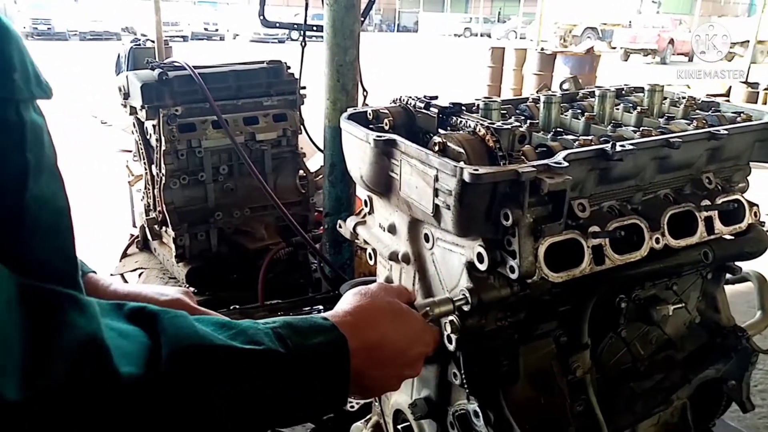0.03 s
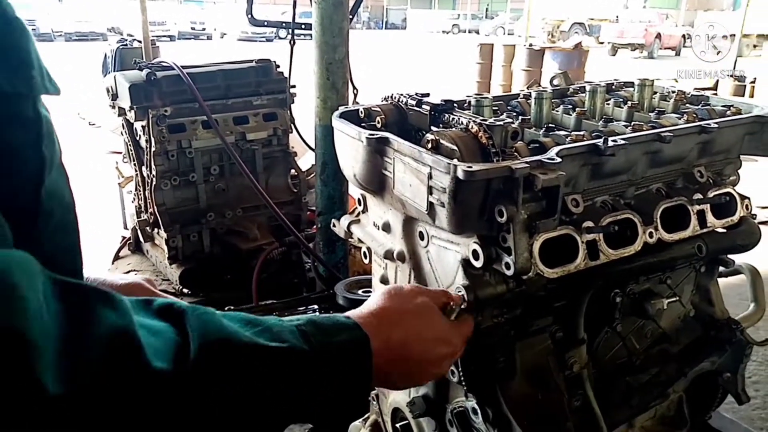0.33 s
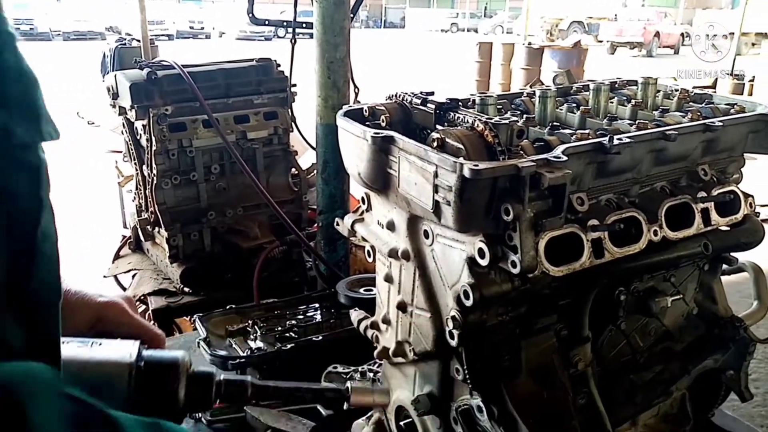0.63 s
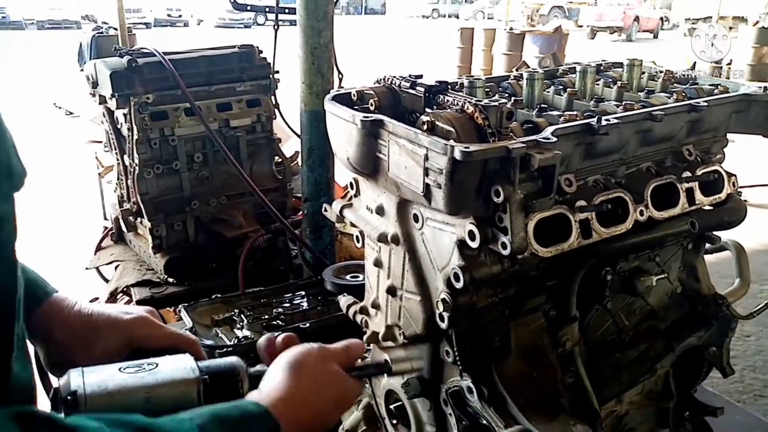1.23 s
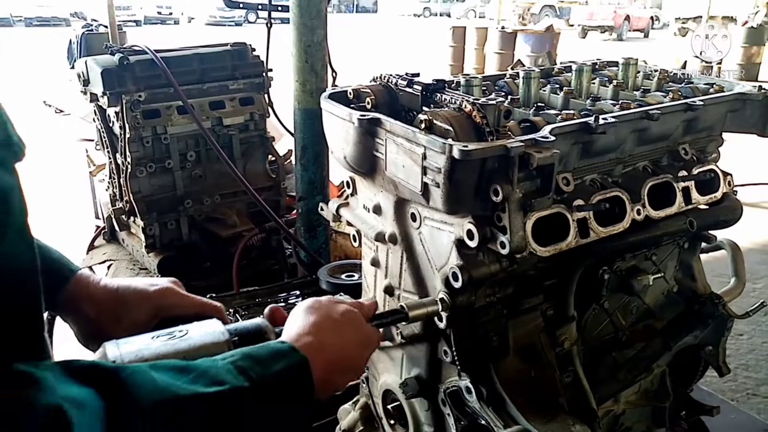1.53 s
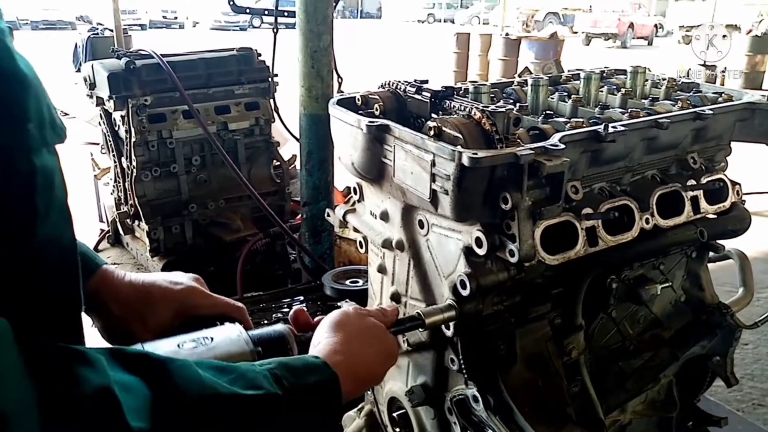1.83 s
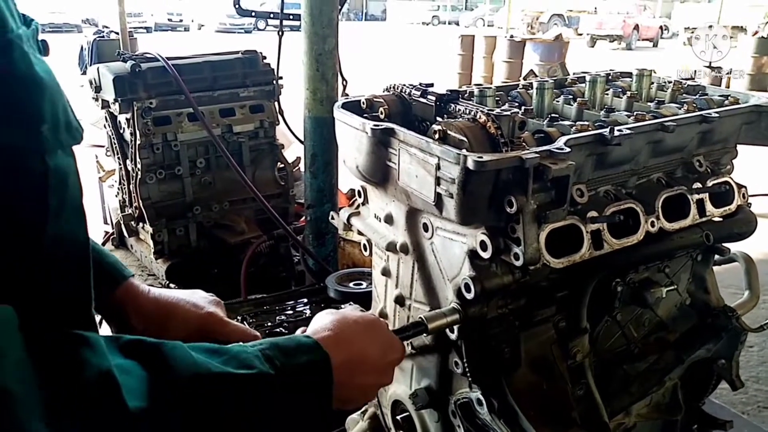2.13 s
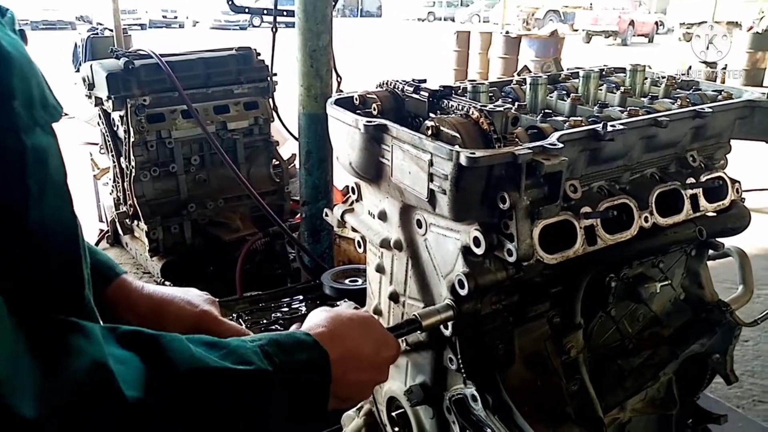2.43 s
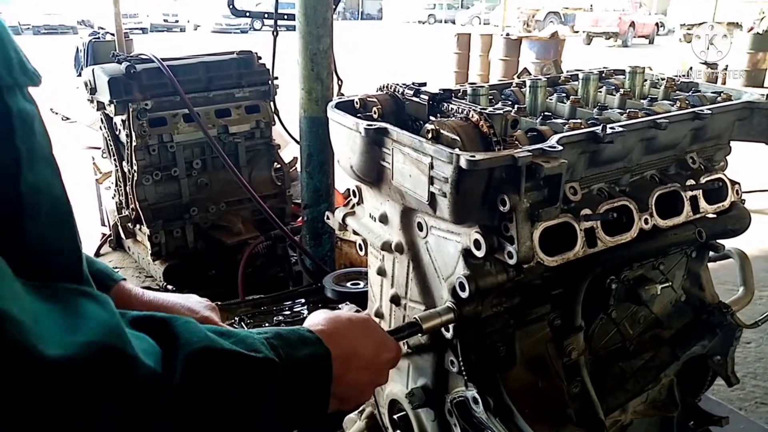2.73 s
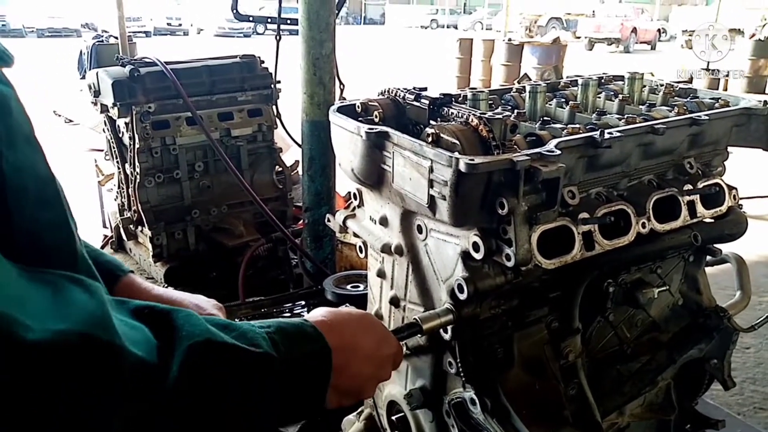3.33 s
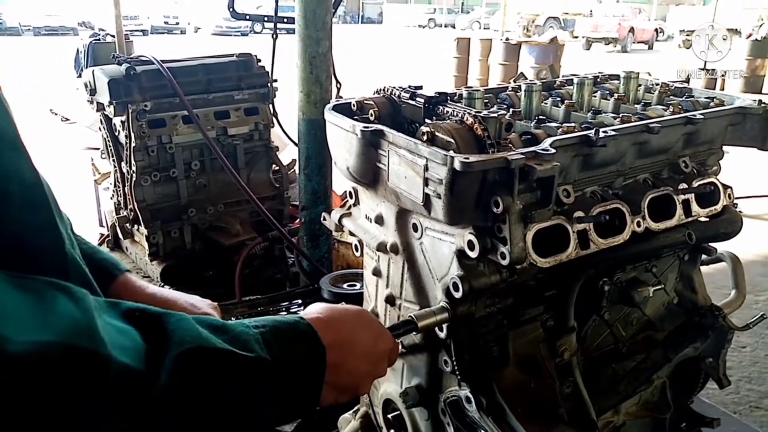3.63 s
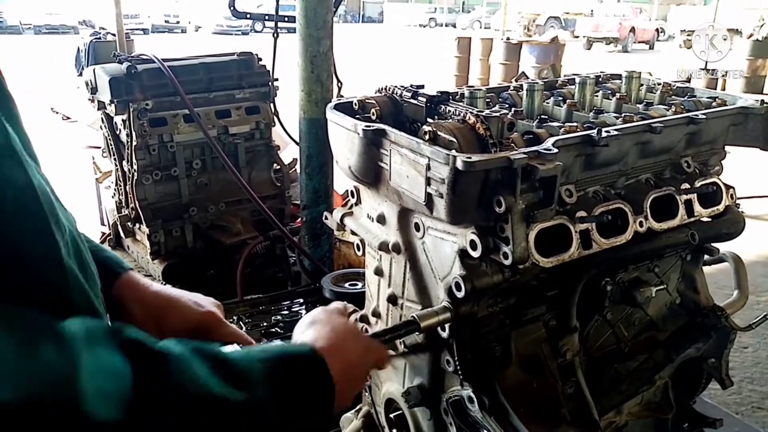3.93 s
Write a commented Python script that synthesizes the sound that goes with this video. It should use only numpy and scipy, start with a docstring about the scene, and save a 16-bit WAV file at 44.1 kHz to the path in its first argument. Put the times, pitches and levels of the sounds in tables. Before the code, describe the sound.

Close up in a workshop, an air impact wrench slows with a sputtering whir. Loose steel lands with a clank and a high ring, a socket clicks into place, and the wrench pounds an engine bolt with hissing air.

```python
"""In an open workshop, an air impact wrench works on an engine block. Its vane motor whirs down and
idles on a trickle of air while the socket rattles. Loose steel drops with a clank and a high ring,
and the socket clicks onto the next bolt. Then the hammer inside the wrench pounds the bolt: each
blow stalls the motor, which puffs and hisses as it speeds up for the next."""
import sys
import numpy as np
from scipy import signal
from scipy.fft import rfft, irfft, next_fast_len
from scipy.io import wavfile

SR = 44100
rng = np.random.default_rng(int(sys.argv[2]) if len(sys.argv) > 2 else 0)


def wav_out(sig):
    """Save sig, one row per channel (or a flat mono array), as 16-bit PCM at SR to the path in sys.argv[1]."""
    wavfile.write(sys.argv[1], SR, np.round(np.clip(np.atleast_2d(sig).T, -1, 1) * 32767).astype(np.int16))


N = 176400
T = np.arange(N) / SR
FIRST_BLOW_S, BLOW_GAP_S = 1.7897, 0.05411

# How hard each hammer blow lands, in turn: (level [dB])
BLOW_STRENGTHS = [-15, -15.5, -14.5, -11.5, -14, -12, -12, -12.5, -13, -15.5, -13, -14, -15, -12, -17.5,
                  -13.5, -13, -18, -14.5, -13.5, -12.5, -16.5, -13.5, -18, -12, -14.5, -14.5, -16.5, -16.5,
                  -16.5, -14.5, -16, -17, -14, -16.5, -15, -15, -15, -13.5, -12.5, -15]
# Blows that jolt the whole engine block: (time [s], level [dB])
JOLTS = [(2.114, -24), (2.386, -24.5), (2.817, -29.5)]
# The crash of a blow, with the recorder's dip and peak in the top treble: (pitch [Hz], level [dB])
CRASH_TONE = [(350, -5), (2800, -7), (7300, -1.5), (9100, 1), (10500, -6), (13800, -17.5), (15000, -3.5),
              (16000, -36)]
# The ringing changes as the socket shifts: (time [s], block [dB], anvil [dB], socket [dB])
RING_LEVELS = [(1.79, -4, -7, -9), (1.95, -16.5, -11, -6), (2.33, -10.5, -4.5, -3), (2.62, -10.5, -10, -8),
               (3.1, -18, -8.5, -7), (3.45, -11, 0.5, -8), (3.75, -7.5, -16, -9)]
# Notes of the block, anvil (the struck shaft) and socket: (pitch [Hz], level [dB], ring time [s])
BLOCK_NOTES = [(1350, 3.5, 0.013), (1900, 3.5, 0.014)]
ANVIL_NOTES = [(4200, 0, 0.011)]
SOCKET_NOTES = [(6810, 1, 0.0047), (6550, 4, 0.032)]
def hammer(blows):
    """Each blow is a burst of tiny contacts that rings anvil, socket and block; a bounce follows."""
    rise_s, hold_s, fall_s, sag_db_per_s = 0.0011, 0.0065, 0.0028, 425
    bounce_s, bounce_db, thud_db = 0.0312, -10, -18.5
    t = T[:int(BLOW_GAP_S * SR)]
    shape = np.minimum(t / rise_s, 1) * amp(-sag_db_per_s * t)
    shape *= np.exp(-np.maximum(t - hold_s, 0) / fall_s)

    def bursts(times, db):
        return chatter() * signal.fftconvolve(impulses(times, amp(db)), shape)[:N]
    hits = bursts(blows, BLOW_STRENGTHS)
    bounces = amp(bounce_db) * bursts(blows + bounce_s, BLOW_STRENGTHS)
    parts = zip(in_time(RING_LEVELS), (BLOCK_NOTES, ANVIL_NOTES, SOCKET_NOTES))
    rings = sum(ring(bursts(blows, BLOW_STRENGTHS) * amp(db), notes) for db, notes in parts)
    thuds = colour(amp(thud_db) * bursts(blows, BLOW_STRENGTHS), KNOCK_TONE)
    jolts = colour(bursts(*np.transpose(JOLTS)), PUFF_TONE)  # as deep as the motor's puffs
    return colour(hits + bounces, CRASH_TONE) + rings + thuds + jolts


# Rushing air, with the recorder's dip and peak in the top treble: (pitch [Hz], level [dB])
FULL_HISS_TONE = [(240, -37), (400, -6.5), (570, -15.5), (1230, -1.5), (3470, -1.5), (5110, -4),
                  (6850, -2.5), (9470, -5.5), (13500, -18.5), (15000, -5.5), (16000, -27.5)]
# Notes of the muffler on the air outlet: (pitch [Hz], width [Hz], level [dB])
MUFFLER_NOTES = [(1227, 50, -18.5), (1602, 43, -15), (2883, 86, -11)]
# Its top note breaks into a whistle: (time [s], length [s], level [dB])
WHISTLES = [(3.047, .11, -36), (3.847, 0.14, -30)]
def working_motor(blows):
    """The motor stalls after each blow, then restarts with a run of puffs. Gives air and puffs."""
    trigger_s, opening_s, hiss_db, puffs_db = 1.71, 0.036, -23, -35
    stall_depth, stall_at_s, stall_width_s = 0.43, 0.013, 0.005
    restart_s, vanes, vane_gap_s, fade_db_per_puff = 0.0212, 7, 0.0057, 1.6
    valve = np.clip((T - trigger_s) / opening_s, 0, 1) ** 2
    since_blow = (T - FIRST_BLOW_S) % BLOW_GAP_S
    stall = stall_depth * np.exp(-((since_blow - stall_at_s) / stall_width_s) ** 2)
    flow = valve * (1 - stall) * amp(hiss_db)
    air = colour(noise() * flow, FULL_HISS_TONE)
    air += sum(amp(db) * resonate(noise() * flow, hz, width) for hz, width, db in MUFFLER_NOTES)
    whistle = sum(amp(db) * ((T > s) & (T < s + length)) for s, length, db in WHISTLES)
    air += resonate(noise() * whistle, MUFFLER_NOTES[-1][0], width_hz=57)
    starts = np.r_[blows[:2] - 2 * BLOW_GAP_S, blows] + restart_s  # puffing begins before the blows
    kicks = sum(impulses(starts + k * vane_gap_s, amp(-fade_db_per_puff * k)) for k in range(vanes))
    kicks *= np.sqrt(SR * BLOW_GAP_S / vanes)
    return air, air_puffs(kicks, np.sqrt(valve) * amp(puffs_db), swirl=0.45)


# The motor slows, idles and stops: (time [s], puff rate [Hz], puffs [dB], hiss [dB])
WIND_DOWN = [(0, 290, -36, -31.5), (.05, 243, -41, -35.5), (.19, 112, -37.5, -39), (.43, 94.4, -47.5, -42),
             (.48, 104.9, -43, -36.5), (.765, 99, -42, -40.5), (.83, 8, -100, -89)]
# Idle hiss, with the recorder's dip and peak in the top treble: (pitch [Hz], level [dB])
IDLE_HISS_TONE = [(400, -41.5), (1030, -13.5), (2220, -15), (3640, -15.5), (6800, -13.5), (9300, -14),
                  (13100, -39.5), (16000, -19)]
# The howl of the air outlet: (pitch [Hz], level [dB])
HOWL_TONE = [(500, -31.5), (770, -13.5), (1050, -17), (1330, -1), (1800, -14), (3000, -33)]
# Notes of the wrench's case, rung by the air: (pitch [Hz], level [dB], ring time [s])
CASE_NOTES = [(1360, -0.5, .04), (2900, -2, 0.025), (5360, -1.5, 0.014)]
def idling_motor():
    """Each vane (motor blade) lets out a puff, sputtering as it slows. Gives air and puffs."""
    sputter_by_s, jitter_s, sputter_db = 0.25, 0.002, 3
    hiss_pulsing, howl_db, howl_power, case_db = 0.34, -20, 2.68, -2
    vane_hz, puffs_db, hiss_db = in_time(WIND_DOWN)
    vane_count = np.cumsum(vane_hz) / SR
    passes = np.flatnonzero(np.diff(np.floor(vane_count)))
    uneven = np.clip(T / sputter_by_s, 0.5, 1) ** 3
    times = T[passes] + jitter_s * (uneven * rng.standard_normal(N))[passes]
    sizes = amp(sputter_db * uneven * rng.standard_normal(N))[passes]
    kicks = impulses(times, sizes) * np.sqrt(SR / vane_hz)
    puffs = air_puffs(kicks, amp(puffs_db), swirl=uneven / 2)
    flow = 1 + hiss_pulsing * np.cos(2 * np.pi * vane_count)
    howl_level = amp(howl_db) * (vane_hz / vane_hz[0]) ** howl_power  # drops fast with speed
    howl = colour(noise() * flow * howl_level, HOWL_TONE)
    whir = ring(noise() * flow * amp(hiss_db + case_db), CASE_NOTES)
    hiss = colour(noise() * flow * amp(hiss_db), IDLE_HISS_TONE)
    return hiss + howl + whir, puffs


# One low puff of air: (pitch [Hz], level [dB])
PUFF_TONE = [(30, -36), (100, 0), (165, -1.5), (230, 4.5), (320, -6.5), (420, -11.5), (1000, -34.5)]
def air_puffs(kicks, gain, swirl):
    """Each kick becomes a puff, with swirling air in between."""
    return colour((kicks + swirl * noise()) * gain, PUFF_TONE)


# The dropped metal lands and bounces: (time [s], level [dB])
LANDINGS = [(0.835, -22), (0.848, -16.5), (0.866, -26), (.913, -26.5), (0.971, -34.5)]
# One heavy knock: (pitch [Hz], level [dB])
KNOCK_TONE = [(40, -21), (130, 0.5), (260, 5), (550, -7), (1000, -5.5), (16000, -31.5)]
# Notes of the dropped metal: (pitch [Hz], level [dB], ring time [s])
CLANK_NOTES = [(233, -4.5, 0.18), (915, 2, 0.033), (1076, 8.5, 0.1), (1714, -1, 0.028), (12950, 4.5, .13)]
def clank():
    """Heavy metal lands on the bench, bounces and rings."""
    times, db = np.transpose(LANDINGS)
    contacts = chatter() * die_away(impulses(times, amp(db)), fade_s=0.072)
    return colour(contacts, KNOCK_TONE) + amp(-5) * ring(contacts, CLANK_NOTES)


# Touches on the loose steel: (time [s], click [dB], ring [dB])
STEEL_TOUCHES = [(0.055, -29, -18.5), (.125, -19.5, -27), (0.189, -26, -30.5), (0.812, -21, -28),
                 (0.848, -21.5, -17.5), (0.999, -55.5, -30)]
# Its notes, so close together that they waver: (pitch [Hz], level [dB], ring time [s])
STEEL_NOTES = [(8570, 0, 0.26), (8580.6, -6, .26), (8602, -12, .2)]
def steel_ring():
    """Each touch adds energy to a high ring; fingers cut it short until the steel is let go."""
    let_go_s, held_ring_s = 0.5, 0.11
    times, _, ring_db = np.transpose(STEEL_TOUCHES)
    energy = impulses(times, amp(ring_db) ** 2)
    held = T < let_go_s
    damped = die_away(energy * held, held_ring_s / 2)  # energy fades twice as fast as the vibration
    return sum(amp(db) * np.sqrt(damped + die_away(energy * ~held, ring_s / 2))
               * np.sin(2 * np.pi * hz * T) for hz, db, ring_s in STEEL_NOTES)


# Dry clicks of the tool and socket: (time [s], level [dB])
TOOL_CLICKS = [(0.76, -27.5), (1.390, -32.5), (1.435, -38), (1.69, -49.5)]
# One bright click: (pitch [Hz], level [dB])
CLICK_TONE = [(300, -15), (6000, 2.5), (16000, -8.5)]
def clicks():
    """Metal taps lightly on the loose steel, the tool and the socket."""
    steel_s, steel_db, _ = np.transpose(STEEL_TOUCHES)
    tool_s, tool_db = np.transpose(TOOL_CLICKS)
    taps = impulses(steel_s, amp(steel_db)) + impulses(tool_s, amp(tool_db))
    return colour(chatter() * die_away(taps, fade_s=0.034), CLICK_TONE)


# Background, fading echo and rustle together: (time [s], level [dB])
BACKGROUND_LEVEL = [(1.0, -45), (1.13, -52.5), (1.21, -52), (1.6, -71.5)]
# Their low tone: (pitch [Hz], level [dB])
BACKGROUND_TONE = [(40, -8.5), (260, -2.5), (646, -18.5), (965, -13.5), (16000, -35.5)]
def background():
    """Low background, with the clank's echo dying away and a faint rustle."""
    return colour(noise() * amp(in_time(BACKGROUND_LEVEL)[0]), BACKGROUND_TONE)


def amp(db):
    """Turns decibels into a number to multiply by."""
    return 10 ** (np.asarray(db) / 20)


def unit(x):
    """Scales a signal to an average power of one."""
    return x / np.sqrt(np.mean(x ** 2) + 1e-20)


def in_time(rows):
    """Turns a table's columns into curves over time."""
    times, *columns = np.transpose(rows)
    return [np.interp(T, times, column) for column in columns]


def colour(x, tone):
    """Shapes a sound's lows and highs by a tone table; white noise keeps its level."""
    hz, db = np.transpose(tone)
    size = next_fast_len(N + SR // 2, True) // 2 * 2
    bin_hz = np.arange(size // 2 + 1) * SR / size
    gain = unit(amp(np.interp(np.log(bin_hz + 1), np.log(hz), db)))
    # fold the filter so that nothing sounds before its cause
    cepstrum = irfft(np.log(gain))
    cepstrum[1:size // 2] *= 2
    cepstrum[size // 2 + 1:] = 0
    return irfft(rfft(x, size) * np.exp(rfft(cepstrum)))[..., :N]


def resonate(x, hz, width_hz):
    """Rings at one pitch; white noise keeps its level."""
    r = np.exp(-np.pi * width_hz / SR)
    feed = np.sqrt((1 - r * r) / 2) * np.array([1, 0, -1])
    feedback = [1, -2 * r * np.cos(2 * np.pi * hz / SR), r * r]
    return signal.lfilter(feed, feedback, x + 1e-18)


def ring(x, notes):
    """An object's notes share the energy put in; each falls 60 dB in its ring time."""
    total = np.sqrt(sum(amp(db) ** 2 for _, db, _ in notes))
    return sum(amp(db) * resonate(x, hz, np.log(1000) / np.pi / s) for hz, db, s in notes) / total


def impulses(times, sizes):
    """Single kicks at the given times."""
    return np.bincount((np.abs(times) * SR).astype(int), sizes * np.ones(len(times)), N)[:N]


def die_away(kicks, fade_s):
    """Each kick fades by 60 dB in the given time."""
    return signal.lfilter([1], [1, -amp(-60 / (fade_s * SR))], kicks + 1e-18)


def noise(shared=0.17):
    """White noise, partly alike on the left and right."""
    common, *own = rng.standard_normal((3, N))
    return np.sqrt(shared) * common + np.sqrt(1 - shared) * np.array(own)


def chatter(contacts_per_s=5000):
    """Many tiny metal contacts at random moments."""
    return unit(noise() * (rng.random(N) < contacts_per_s / SR))


def place(x, room_db, pan_db=0):
    """Sound reaches the left microphone first and echoes around the workshop."""
    right_lag_s, echo_s = 0.000829, 0.32
    left, right = np.broadcast_to(x, (2, N))
    direct = np.array([left, np.interp(T - right_lag_s, T, right)])
    tail = rng.standard_normal((2, SR)) * amp(-60 * T[:SR] / echo_s)
    tail /= np.sqrt((tail ** 2).sum(1, keepdims=True))
    echoes = signal.fftconvolve(direct, tail, axes=1)[:, :N]
    return (direct + amp(room_db) * echoes) * amp([[pan_db / 2], [-pan_db / 2]])


def scene():
    """The wrench, loose metal and background, heard in stereo."""
    blows = np.arange(FIRST_BLOW_S, N / SR, BLOW_GAP_S)
    idle_air, idle_puffs = idling_motor()
    work_air, work_puffs = working_motor(blows)
    mix = place(idle_air + work_air + clicks() + hammer(blows), room_db=-11.5)
    mix += place(idle_puffs + work_puffs, room_db=-14.5)
    mix += place(clank(), room_db=-6.5, pan_db=-1.5)
    mix += place(steel_ring(), room_db=-27, pan_db=-5)
    return mix + place(background(), room_db=-9)


# How much louder the left microphone is than the right: (pitch [Hz], difference [dB])
MIC_BALANCE = [(250, -0.8), (1200, 4.5), (4400, 0.5), (8000, -3.5)]
def record(dry):
    """The two microphones differ in tone; deep bass and top treble are cut, and peaks are rounded."""
    low_cut_hz, high_cut_hz = 81, 15800
    hz, db = np.transpose(MIC_BALANCE)
    bin_hz = np.arange(N + 1) * SR / (2 * N)
    tilt = np.interp(np.log(bin_hz + 1), np.log(hz), db)
    heard = irfft(rfft(dry, 2 * N) * amp([tilt / 2, -tilt / 2]))[:, :N]
    heard = signal.sosfilt(signal.butter(2, low_cut_hz, "high", fs=SR, output="sos"), heard)
    return signal.sosfilt(signal.ellip(10, 0.1, 80, high_cut_hz, fs=SR, output="sos"), np.tanh(heard))


dry = scene()
out = record(dry)
wav_out(out)
```